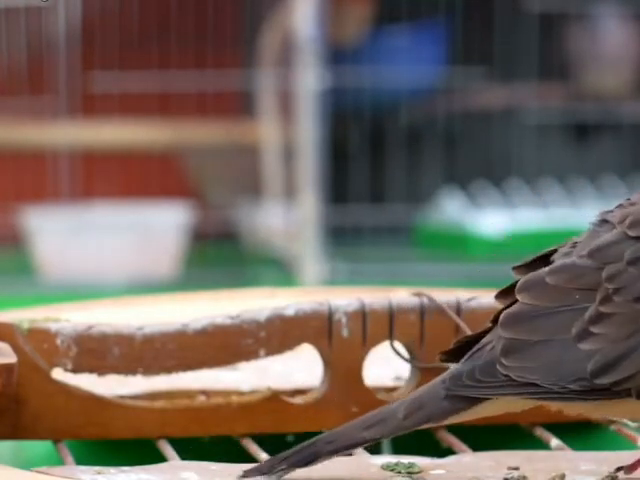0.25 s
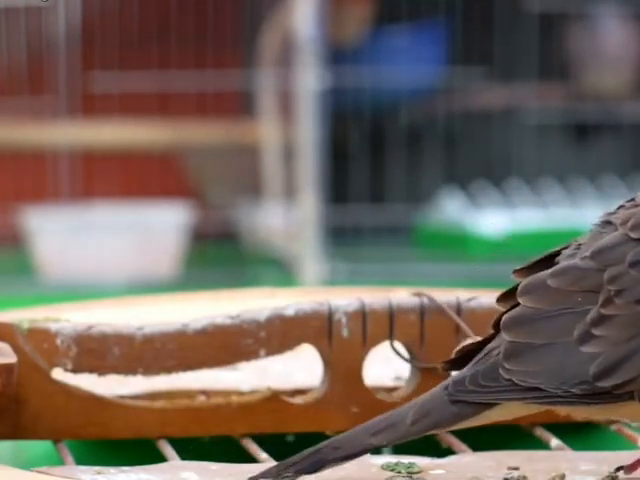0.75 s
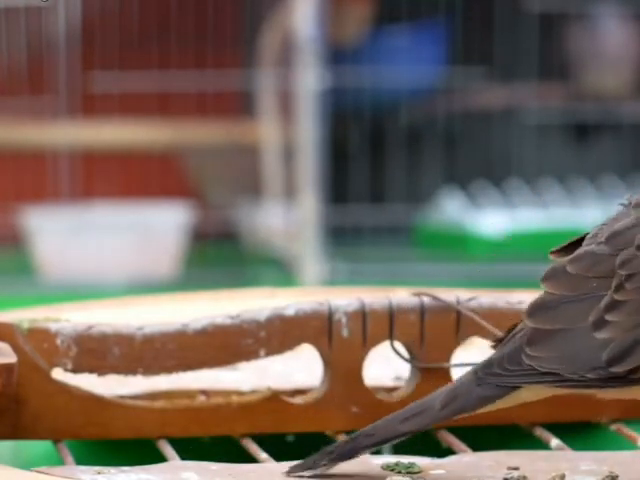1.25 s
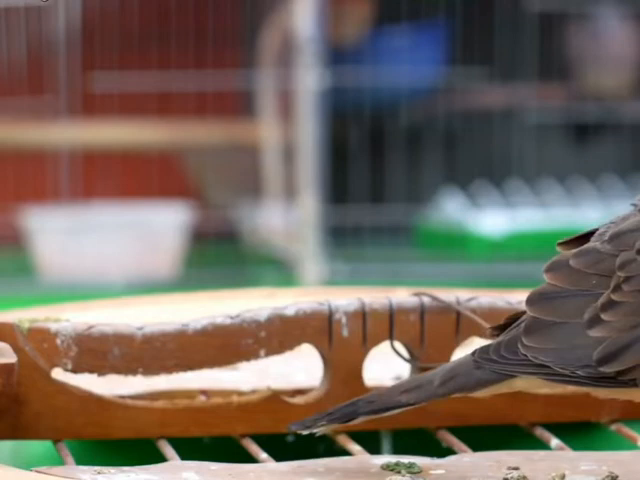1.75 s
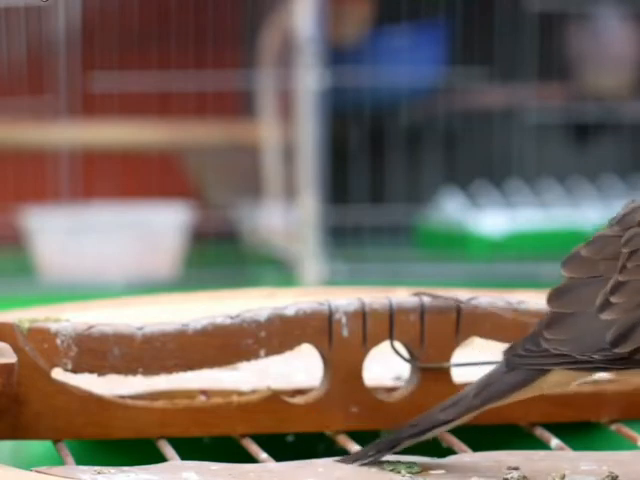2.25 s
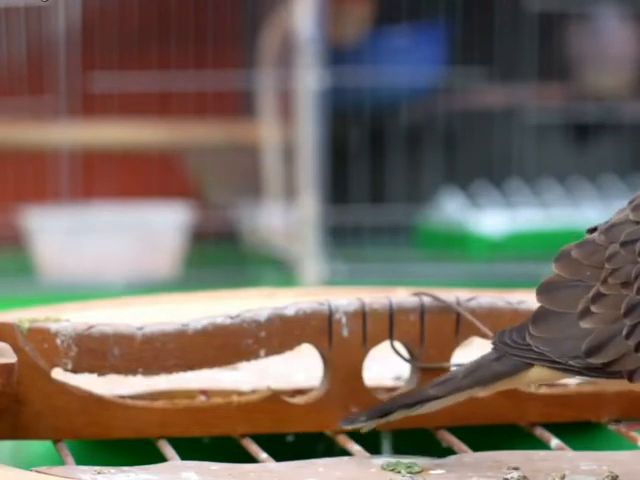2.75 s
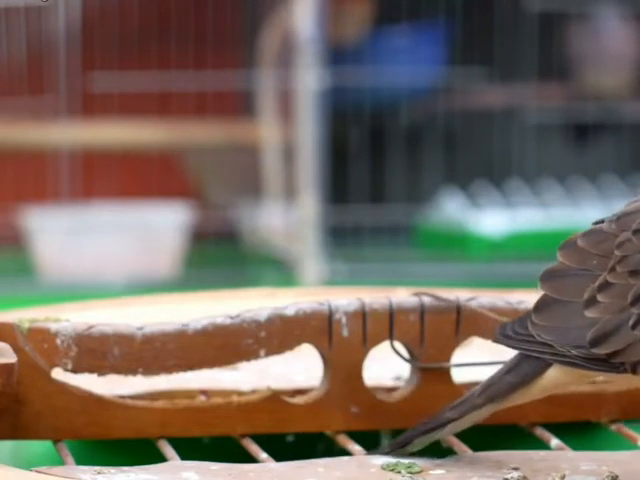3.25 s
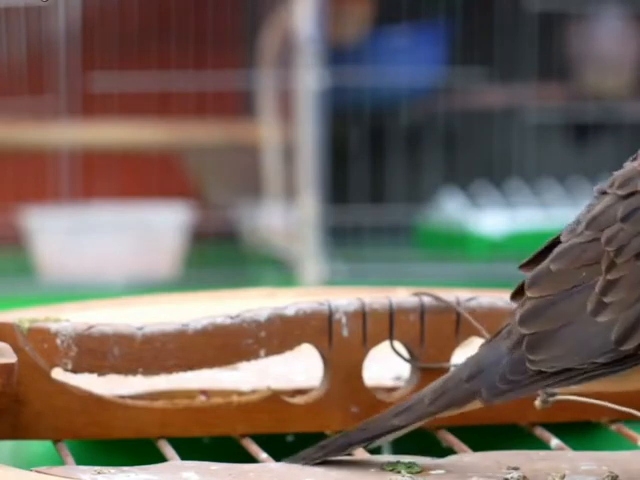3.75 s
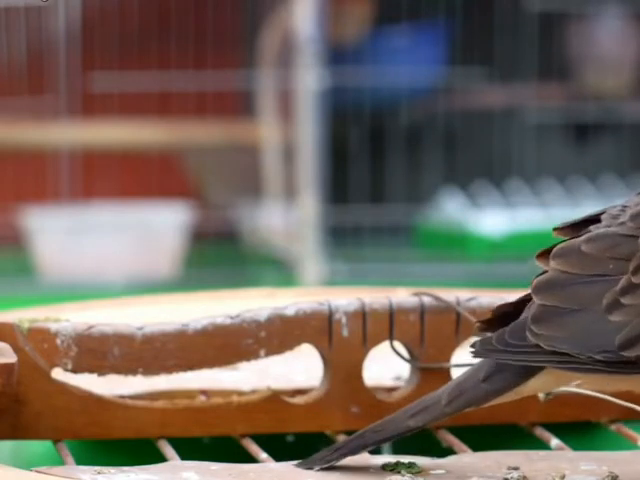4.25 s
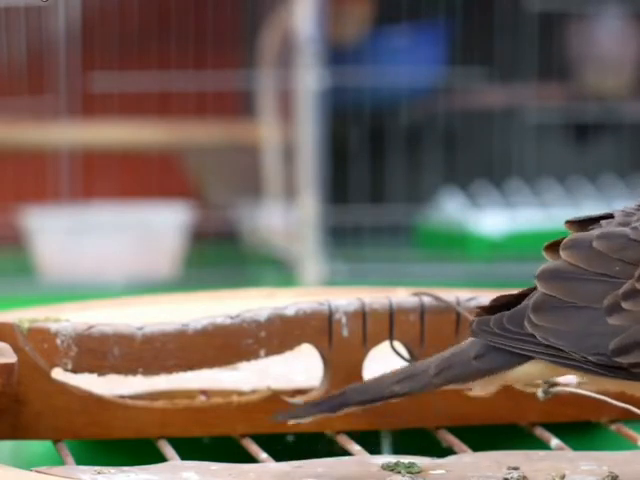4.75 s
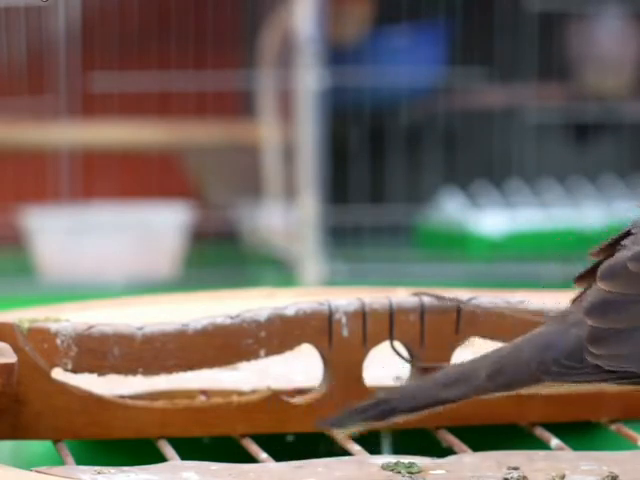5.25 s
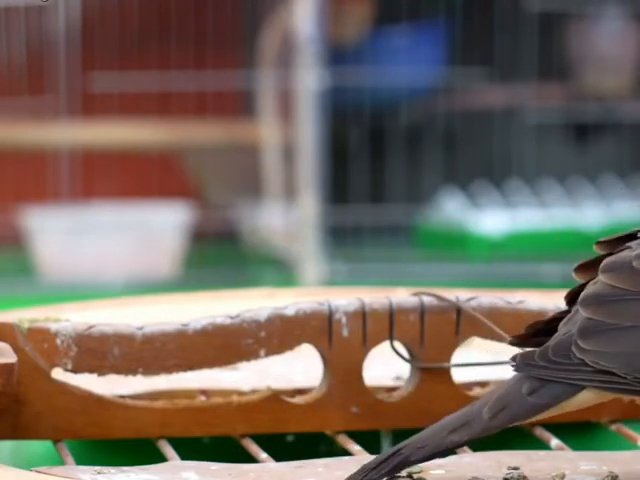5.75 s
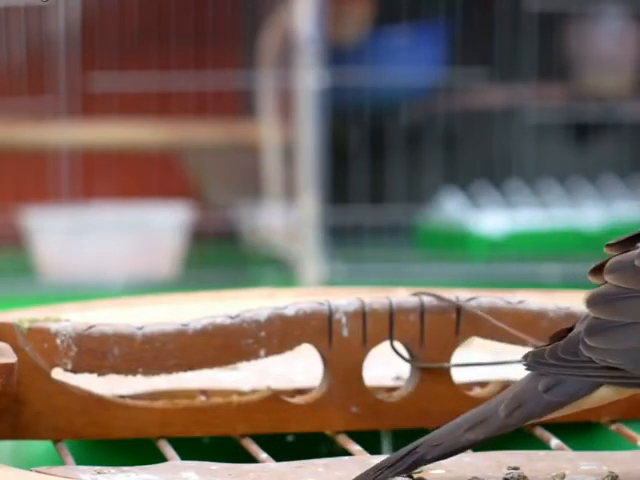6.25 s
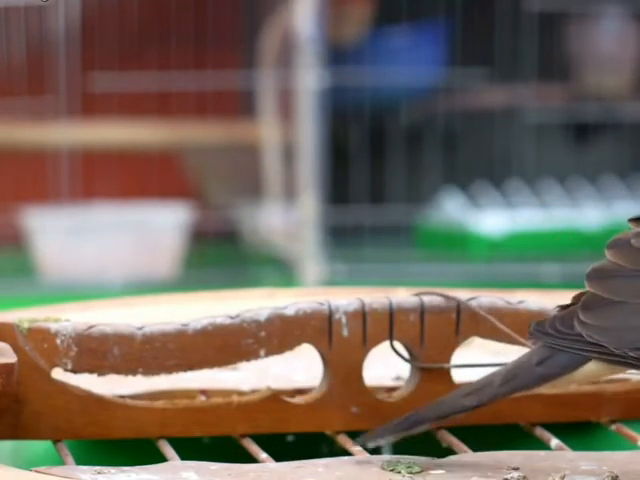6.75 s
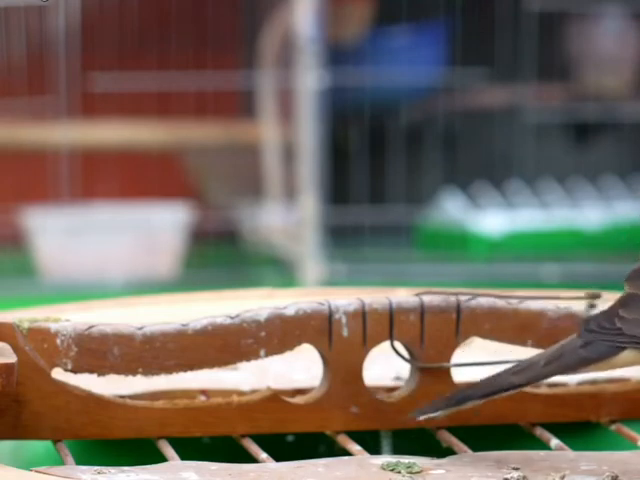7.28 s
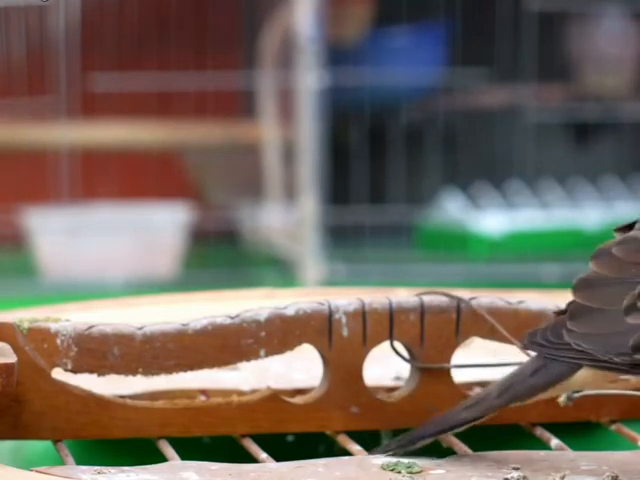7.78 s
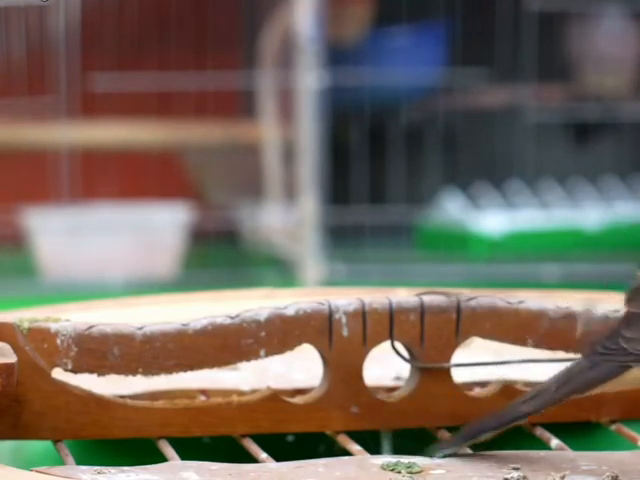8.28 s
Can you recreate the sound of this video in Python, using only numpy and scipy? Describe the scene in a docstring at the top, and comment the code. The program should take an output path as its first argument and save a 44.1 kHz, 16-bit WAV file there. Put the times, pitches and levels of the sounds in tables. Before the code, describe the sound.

A caged dove coos very close, seven times: a short rolled, trilled note, then a longer one that rises, smooths and falls into a rattle. The fourth call has an extra long note. Claws tick on the cage, feathers rustle and the perch scrapes between calls. Another dove answers faintly. A low motor hum and rushing air swell up in the pauses as the microphone's automatic gain recovers.

```python
"""A motor hums and whines under moving air; claws tick on a cage and a small bird peeps faintly twice.
From 0.2 s a caged spotted dove coos close by: seven times a short rolled note and a long falling one, the
fourth time with a second long note. Feathers and perch scrape from about 1 s; a farther dove answers from
2.1 s. Doves are trilled tones, the rest shaped noise and tones. The camera's gain control flattens
the coos and lets the background swell back in the pauses."""
import sys
import numpy as np
from scipy import signal
from scipy.fft import rfft, irfft, next_fast_len
from scipy.io import wavfile
from scipy.ndimage import uniform_filter1d, minimum_filter1d, map_coordinates

SR = 44100
rng = np.random.default_rng(int(sys.argv[2]) if len(sys.argv) > 2 else 0)


def persist_wave(psi):
    """Save psi, clipped to +-1, as 16-bit WAV."""
    counts = np.round(np.clip(psi, -1, 1) * 32767).astype(np.int16)
    wavfile.write(sys.argv[1], SR, np.atleast_2d(counts).T)


N = 375732
TIME = np.arange(N) / SR

# inflated crop and neck, beak shut: (frequency [Hz], gain [dB])
CROP_GAINS = [(200, -33), (310, -14.5), (400, -10.5), (560, -0.5), (680, 5.5), (820, -6.5), (950, -13.5),
              (1130, -18.5), (1700, -28.5), (2500, -33.5), (5000, -28), (7300, -4), (8500, -41.5)]
# dull knock: (frequency [Hz], relative spectral density [dB])
KNOCK_SPECTRUM = [(200, -8.5), (600, -2.5), (1300, 3), (2600, -3), (4500, -10.5), (9000, -23.5)]
# exponent of the pitch rise; change of the overtones at a note's onset
RISE_POWER, ONSET_BUZZ_DB = 2.6, 1


def gain_of(db):
    """Decibels to amplitude."""
    return 10 ** (np.asarray(db) / 20)


def evened(x):
    """Scales to rms 1."""
    return x / np.sqrt(np.mean(x ** 2) + 1e-20)


def read(points, hz):
    """Reads a table on a log-frequency axis."""
    f, value = np.transpose(points)
    return np.interp(np.log(hz + 1), np.log(f + 1), value)


def add(mix, start_s, sound):
    """Mixes a sound in at start_s."""
    part = mix[max(round(start_s * SR), 0):][:len(sound)]
    part += sound[:len(part)]


def drift(t, knots_per_s):
    """Smooth random curve of rms about 1 at the times t: a spline through random knots."""
    knots = rng.standard_normal(4096)
    return map_coordinates(knots, [(t - t[0]) * knots_per_s], order=3, mode="wrap")


def noise_pair(spectrum):
    """Noise of rms 1 at two close microphone ports: alike in the bass, less so in the treble."""
    # left-right correlation: (frequency [Hz], correlation [0-1])
    port_likeness = [(100, 1), (1000, 1), (4000, 1), (8000, 0.97), (14000, 0.4)]
    size = next_fast_len(N)
    hz = np.fft.rfftfreq(size, 1 / SR)
    mid, side = rfft(rng.standard_normal((2, size))) * gain_of(read(spectrum, hz))
    same = np.clip(read(port_likeness, hz), 0, 1)
    mid = mid * np.sqrt(1 + same)
    side = side * np.sqrt(1 - same)
    return evened(irfft([mid + side, mid - side], size)[:, :N])


def blurred_tone(hz, width_hz):
    """A narrow band of noise of rms 1 that follows a pitch."""
    phase = 2 * np.pi * np.cumsum(hz * np.ones(N)) / SR
    in_phase = drift(TIME, width_hz) * np.cos(phase)
    quadrature = drift(TIME, width_hz) * np.sin(phase)
    return evened(in_phase + quadrature)


def tap(db, decay_s, rise_s=.001):
    """Envelope of a brief touch: exponential rise and decay."""
    t = np.arange(SR // 16) / SR
    return gain_of(db) * (1 - np.exp(-t / rise_s)) * np.exp(-t / decay_s)


def through(x, spectrum):
    """A minimum-phase filter with the given gains: it rings after the sound, never before."""
    size = 4096
    log_gain = np.log(gain_of(read(spectrum, abs(np.fft.fftfreq(size, 1 / SR)))))
    response = np.fft.ifft(np.exp(signal.hilbert(log_gain).conj())).real
    return signal.oaconvolve(x, response[:size // 2])[:N]


def room(x):
    """Sparse reflections of random sign, each band dying at its own speed."""
    # reverberation: (frequency [Hz], time to fall 60 dB [s])
    decay_times = [(150, 0.17), (550, 0.47), (2000, 0.56), (10000, .15)]
    taps_per_s = 2000
    taps = rng.choice([-1., 1.], SR) * (rng.random(SR) < taps_per_s / SR)
    taps[:SR // 200] = 0  # no reflection in the first 5 ms
    hz, t, bands = signal.stft(taps, SR, nperseg=256)
    decay = gain_of(-60 * t / read(decay_times, hz)[:, None])
    tail = signal.istft(bands * decay, SR, nperseg=256)[1]
    coo_band = abs(rfft(tail, SR))[400:700]  # bins are 1 Hz apart
    return signal.fftconvolve(x, tail / np.sqrt(np.mean(coo_band ** 2)))[:N]


def lagged(x, lag_s):
    """Follows a control with a first-order lag."""
    r = np.exp(-1 / (lag_s * SR))
    return x[0] + signal.lfilter([1 - r], [1, -r], x - x[0])


def background(air_db=-22, swell_db=1, whine_db=-39, whine_width_hz=115,
               upper_hz=8170, upper_db=-52, upper_width_hz=90):
    """A motor hums and whines, its thin high notes blurred, over the rush of moving air."""
    # motor hum: (frequency [Hz], mean level [dB])
    hum_tones = [(89.8, -15.5), (145, -35), (297, -37)]
    # moving air: (frequency [Hz], relative spectral density [dB])
    air_spectrum = [(15, -12.5), (35, -3.5), (52, 2), (72, -8), (120, -10), (250, -11), (600, -14.5),
                    (1100, -22), (2000, -29.5), (4000, -36), (6000, -38.5), (8300, -41.5), (12000, -44.5),
                    (14500, -56)]
    whine_hz, waver_hz, wavers_per_s = 4559, 25.9, 7
    hum = np.zeros(N)
    for hz, db in hum_tones:
        level = gain_of(db + 1.1 * drift(TIME, 14))
        hum += level * np.sin(2 * np.pi * hz * TIME + 0.072 * drift(TIME, 5.2))
    whine_pitch_hz = whine_hz + waver_hz * drift(TIME, wavers_per_s)
    whine = gain_of(whine_db) * blurred_tone(whine_pitch_hz, whine_width_hz)
    upper = gain_of(upper_db) * blurred_tone(upper_hz, upper_width_hz)
    air = gain_of(air_db + swell_db * drift(TIME, 7.8)) * noise_pair(air_spectrum)
    return np.sqrt(2) * hum + whine + upper + air


def small_bird(width_hz=160):
    """Thin faint peeps of a small bird in another cage: narrow bands of noise."""
    # peeps: (start [s], length [s], centre frequency [Hz], peak level [dB])
    peeps = [(0.107, .09, 3550, -46), (1.998, 0.13, 3520, -39)]
    out = np.zeros(N)
    for start_s, length_s, hz, db in peeps:
        swell = np.zeros(N)
        add(swell, start_s, gain_of(db) * np.hanning(round(length_s * SR)))
        out += swell * blurred_tone(hz, width_hz)
    return out


def perch(grain_db=2.5):
    """Feet and tail scrape unevenly over the perch, which answers with a low thud."""
    # weight shifts: (start [s], length [s], scrape level [dB], thud level [dB])
    scuffs = [(1.19, 0.09, -31.5, -16), (2.2, 0.17, -32, -23), (3.058, .22, -20, -27),
              (3.307, 0.17, -25, -38), (4.548, .015, -24, -24), (6.422, 0.23, -27.5, -20),
              (7.499, 0.1, -36, -19.5)]
    # dull scrape: (frequency [Hz], relative spectral density [dB])
    scrape_spectrum = [(150, -13), (600, 0.5), (950, 3), (1400, -7), (2200, -13.5), (4000, -27.5),
                       (9000, -41)]
    # low thud: (frequency [Hz], relative spectral density [dB])
    thud_spectrum = [(12, -15.5), (30, 4.5), (60, 0.5), (120, -13.5), (400, -38), (2000, -83)]
    scrapes, thuds = np.zeros((2, N))
    for start_s, length_s, scrape_db, thud_db in scuffs:
        swell = signal.windows.tukey(round(length_s * SR), .7)
        add(scrapes, start_s, gain_of(scrape_db) * swell)
        add(thuds, start_s, gain_of(thud_db) * swell)
    grain = gain_of(grain_db * drift(TIME, 150))
    return scrapes * grain * noise_pair(scrape_spectrum) + thuds * noise_pair(thud_spectrum)


def feathers(level_db=-1, grain_db=3, clump_db=3.5, edge_db=-11.5):
    """Barbs slide over each other and over the perch in small uneven strokes."""
    # shuffles: (peak time [s], swell [s], fade [s], relative peak level [dB])
    shuffles = [ (1.22, .4, 0.23, -24), (2.18, 0.037, 0.13, -24.5), (2.371, .21, 0.11, -19),
                (3.24, 0.29, 0.4, -22), (5.47, 0.023, 0.104, -22.5), (6.44, 0.064, .06, -25.5),
                (7.32, 0.066, 0.068, -18.5), (7.53, 0.076, 0.047, -28), (8.34, 0.023, 0.064, -20.5)]
    # feather noise: (frequency [Hz], relative spectral density [dB])
    feather_spectrum = [(200, -4.5), (600, 19.5), (1400, 1), (3500, -2.5), (6000, -7.5), (8300, -2),
                        (9500, -12), (12000, -1.5), (14500, -35)]
    stroke = np.zeros(N)
    for peak_s, swell_s, fade_s, peak_db in shuffles:
        t = np.arange(-swell_s, fade_s, 1 / SR)
        db = peak_db + edge_db * np.maximum(-t / swell_s, t / fade_s)
        add(stroke, peak_s - swell_s, gain_of(db) * signal.windows.tukey(len(t), .1))
    uneven_db = level_db + grain_db * drift(TIME, 400) + clump_db * drift(TIME, 50)
    return stroke * gain_of(uneven_db) * noise_pair(feather_spectrum)


def claws(snap_s=0.0044, knock_s=.006, snap_db=5, knock_db=3, room_db=-12):
    """Each touch of claw or quill on the cage is a bright snap and a duller knock."""
    # touches: (time [s], relative snap level [dB], relative knock level [dB])
    touches = [(0.074, -20, -22.5), (1.3, -17, -19), (1.333, -16, -24), (2.163, -15.5, -30),
               (2.269, -25, -23), (3.172, -27, -32), (3.824, -21, -31), (4.461, -31, -45),
               (4.555, -36, -35), (5.432, -10.5, -17.5), (5.473, -11.5, -26.5), (5.482, -25, -28.5),
               (5.592, -23, -12), (6.445, -18.5, -26), (6.493, -21.5, -16), (6.638, -18.5, -21),
               (6.843, -27, -21), (7.31, -24, -14), (7.585, -38.5, -24.5), (8.329, -22, -24)]
    # bright snap: (frequency [Hz], relative spectral density [dB])
    snap_spectrum = [(500, -30.5), (2500, -9.5), (6000, -9), (8300, 4), (9500, -1.5), (12000, 2),
                     (15000, -24)]
    snaps, knocks = np.zeros((2, N))
    for start_s, bright_db, dull_db in touches:
        add(snaps, start_s, tap(bright_db + snap_db, snap_s))
        add(knocks, start_s, tap(dull_db + knock_db, knock_s))
    ticks = snaps * noise_pair(snap_spectrum) + knocks * noise_pair(KNOCK_SPECTRUM)
    return ticks + gain_of(room_db) * np.array([room(port) for port in ticks])


def far_dove(direct_db=-1, room_db=-9, trill_per_s=60, trill_depth=0.43, jitter=.02, fade_share=0.5):
    """Only the fundamental of the other bird carries, blurred by the room."""
    # notes: (start [s], length [s], first pitch [Hz], last pitch [Hz], relative level [dB])
    far_notes = [ (2.08, .17, 617.7, 594, -18), (2.23, .16, 565, 515, -15.5),
                 (3.07, 0.15, 612, 590.6, -11.5), (3.214, .052, 580.5, 576, -1),
                 (3.26, 0.156, 567, 489.5, -11.5), (3.788, 0.039, 519, 534, -9),
                 (3.829, .105, 576.7, 586.3, -3), (3.92, 0.093, 570, 555.6, -12),
                 (7.28, .17, 530, 490, -15.5), (7.77, .12, 605, 587, -15.5), (8.2, 0.17, 591.5, 565.7, -10),
                 (8.36, 0.09, 550, 478, -16.5)]
    voice = np.zeros(N)
    for start_s, length_s, first_hz, last_hz, level_db in far_notes:
        t = np.arange(0, length_s, 1 / SR)
        hz = np.linspace(first_hz, last_hz, len(t)) * (1 + jitter * drift(t, 91))
        trill = 1 + trill_depth * np.sin(2 * np.pi * trill_per_s * t + drift(t, 36))
        tone = np.sqrt(2) * np.sin(2 * np.pi * np.cumsum(hz) / SR)
        swell = signal.windows.tukey(len(t), fade_share)
        add(voice, start_s, gain_of(level_db) * trill * tone * swell)
    return gain_of(direct_db) * voice + gain_of(room_db) * room(voice)


def rolled_note(start_s, length_s, top_hz, sag_hz, effort_db, onset_db, trill_per_s, depth):
    """Controls of a short trilled note: it leaps to its top pitch, sags, and drops as it shuts."""
    start_hz, rise_s, drop_s, drop_hz = 415, .042, .022, 71
    sag_db, shut_db, buzz_db = -2.5, -10, 3
    t = np.arange(0, length_s, 1 / SR)
    rising = np.maximum(1 - t / rise_s, 0) ** RISE_POWER
    sag = np.maximum(t - rise_s, 0) / (length_s - rise_s)
    shut = np.maximum(1 - (length_s - t) / drop_s, 0)
    hz = top_hz + (start_hz - top_hz) * rising + (sag_hz - top_hz) * sag - drop_hz * shut
    db = effort_db - onset_db * rising + sag_db * sag + shut_db * shut
    return start_s + t, hz, db, trill_per_s, depth, buzz_db + ONSET_BUZZ_DB * rising


def long_note(start_s, length_s, rise_s, first_hz, top_hz, end_hz, effort_db, trill_per_s, depth, trill_s):
    """The same controls for a long note: pitch and effort arch; the trill smooths, then rattles at the end."""
    fall_power, effort_db_per_hz, buzz_db = 1.85, .12, -.5
    smooth_depth, rattle_depth, rattle_s, rattle_per_s = .07, .8, 0.041, 105
    t = np.arange(0, length_s, 1 / SR)
    rising = np.maximum(1 - t / rise_s, 0) ** RISE_POWER
    fall = (np.maximum(t - rise_s, 0) / (length_s - rise_s)) ** fall_power
    hz = top_hz + (first_hz - top_hz) * rising + (end_hz - top_hz) * fall
    db = effort_db + effort_db_per_hz * (hz - top_hz)
    opening_trill = depth * np.exp(-(t / trill_s) ** 2)
    rattle = rattle_depth * np.exp((t - length_s) / rattle_s)
    rate = trill_per_s + (rattle_per_s - trill_per_s) * fall
    return start_s + t, hz, db, rate, smooth_depth + opening_trill + rattle, buzz_db + ONSET_BUZZ_DB * rising


def coo(note, slip_turns=0.13, pulse_glide=.36, scoop_share=0.45, jitter=.007, trill_wander=.15,
        rasp=0.15, slope_db_per_octave=-14, attack_s=0.003, release_s=0.0012):
    """The syrinx sings a near sine; a flutter chops it into rising pulses, each a little out of step."""
    t, hz, effort_db, trill_per_s, depth, buzz_db = note
    depth = np.clip(depth * (1.2 + .15 * drift(t, 50)), 0, 1)
    flutter = np.cumsum(trill_per_s * (1 + trill_wander * drift(t, 40))) / SR  # in pulses
    opening = 1 - depth * (1 - abs(np.sin(np.pi * flutter)) ** 1.5)
    # each pulse starts flat and scoops up
    scoop = uniform_filter1d(np.exp(-(flutter % 1) / scoop_share), size=60)
    sweep = pulse_glide * depth * (scoop.mean() - scoop)
    pitch = hz * (1 + sweep + jitter * drift(t, 150))
    slip = slip_turns * depth * rng.standard_normal(256)[flutter.astype(int) % 256]
    turns = np.cumsum(pitch) / SR + uniform_filter1d(slip, size=70)
    overtones = np.zeros(len(t))
    for k in range(2, 15):
        overtones += gain_of(slope_db_per_octave * np.log2(k)) * np.sin(2 * np.pi * k * turns)
    # slack membranes at low pitch buzz; taut ones sing purer
    slack = np.interp(pitch, [420, 560], [1.45, .42])
    turbulence = rasp * (0.26 + depth) * drift(t, 2100)
    voice = np.sin(2 * np.pi * turns) + gain_of(buzz_db) * slack * overtones + turbulence
    gate = np.clip((t - t[0]) / attack_s, 0, 1) * np.clip((t[-1] - t) / release_s, 0, 1)
    # effort is the level of the fundamental outside the crop
    source_gain = gain_of(effort_db - read(CROP_GAINS, hz))
    return t[0], np.sqrt(2) * source_gain * opening * gate * voice


def near_dove(room_db=-23, pop_db=-22, pop_s=0.009, stop_db=2.0, stop_hz=690, stop_s=0.0041):
    """Coos open with a soft pop and shut with a short crop ring; falling pitch beats against its echo."""
    # short notes: (start [s], length [s], top pitch [Hz], sagged pitch [Hz], effort [dB],
    # onset effort below that [dB], mean trill rate [pulses/s], relative trill depth)
    rolls = [ (0.215, 0.17, 548, 500, 15, 8, 88, .44), (1.291, 0.2, 524, 462, 12, 18, 89, .52),
             (2.381, 0.23, 520, 480, 11, 20, 90, .58), (4.568, .13, 515, 372, 12.5, 13.5, 63, .9),
             (5.603, .165, 546, 495, 16.5, 17, 93, .52), (6.573, .175, 552, 468, 13.5, 19, 95, .52),
             (7.598, 0.19, 548, 465, 14, 17, 92, .55)]
    # long notes: (start [s], length [s], rise [s], first pitch [Hz], top pitch [Hz], end pitch [Hz],
    # effort at the top [dB], opening trill rate [pulses/s], relative trill depth, trill fade constant [s])
    long_coos = [ (0.482, 0.32, 0.07, 445.5, 569, 387.7, 20.5, 48.7, 0.28, 0.083),
                 (1.603, 0.36, 0.086, 420.4, 574.6, 372, 21, 61, 0.56, 0.14),
                 (2.704, 0.38, 0.093, 399, 578.4, 365, 20, 65, 0.86, .1),
                 (4.693, .229, .158, 355, 585, 372.5, 22, 71, .8, 0.077),
                 (5.046, 0.36, .075, 426, 578.5, 400, 21.5, 51, .9, .2),
                 (5.86, .349, 0.078, 394, 566.2, 368, 25, 65, 0.4, 0.072),
                 (6.858, .325, 0.071, 406, 567.3, 392, 20, 72, 0.41, .08),
                 (7.895, 0.32, 0.073, 455, 556, 390, 20.5, 77, .4, 0.088)]
    source, pops = np.zeros((2, N))
    stop = tap(stop_db, stop_s)
    stop = stop * np.sin(2 * np.pi * stop_hz * TIME[:len(stop)])
    notes = [rolled_note(*row) for row in rolls] + [long_note(*row) for row in long_coos]
    for note in notes:
        start_s, sound = coo(note)
        add(source, start_s, sound)
        add(source, start_s + len(sound) / SR - .012, stop)
        add(pops, start_s, tap(pop_db, pop_s))
    voice = through(source, CROP_GAINS)
    return voice + gain_of(room_db) * room(voice) + pops * noise_pair(KNOCK_SPECTRUM)


def scene():
    """Both doves, the small bird, the cage noises and the background."""
    birds = near_dove() + far_dove() + small_bird()
    cage = claws() + feathers() + perch()
    return birds + cage + background()


def record(dry, ceiling_db=-7, settle_db=0.82, settle_s=0.14, slow_range_db=10, start_db=8,
           slow_db_per_s=15, fast_db_per_s=220, attack_s=0.001, edge_hz=14400):
    """Gain control holds loud sounds near a ceiling, recovers fast and then slowly; then clip and low-pass."""
    power = uniform_filter1d((dry ** 2).mean(0), size=160)
    over_db = np.maximum(10 * np.log10(abs(power) + 1e-12) - ceiling_db, 0)
    held_db = -minimum_filter1d(-over_db, size=441, origin=220)  # holds each peak for 10 ms
    fast = np.maximum.accumulate(held_db + fast_db_per_s * TIME) - fast_db_per_s * TIME
    slow = np.maximum.accumulate(np.minimum(held_db, slow_range_db) + slow_db_per_s * TIME)
    slow = np.maximum(slow, start_db) - slow_db_per_s * TIME  # the gain starts partly turned down
    # a sustained sound is pressed a little lower than its first instant
    settle = lagged(np.minimum(held_db, settle_db), settle_s)
    cut_db = lagged(np.maximum(fast, slow), attack_s) + settle
    cut_db = np.interp(TIME + .001, TIME, cut_db)  # looks 1 ms ahead
    levelled = np.clip(dry / gain_of(cut_db), -.8, .8)
    low_pass = signal.firwin(511, edge_hz, window=("kaiser", 9), fs=SR)
    return signal.oaconvolve(levelled, low_pass[None], "same")


dry = scene()
out = record(dry)
persist_wave(out)
```